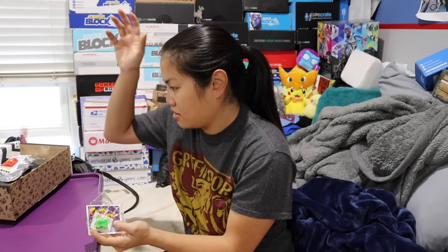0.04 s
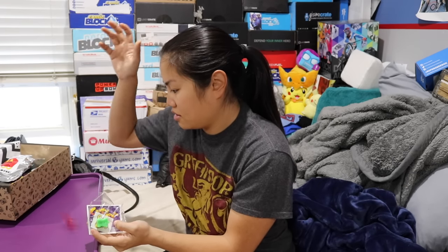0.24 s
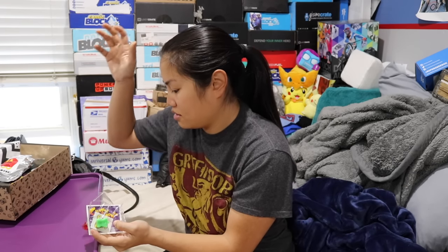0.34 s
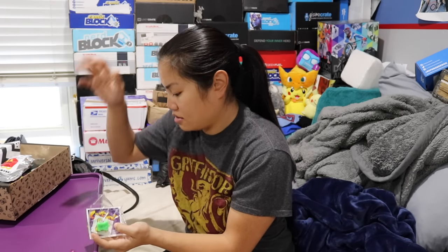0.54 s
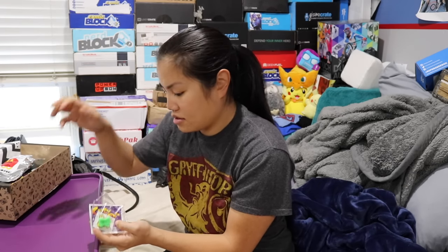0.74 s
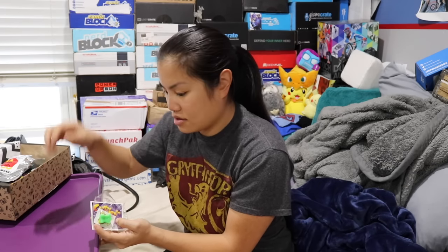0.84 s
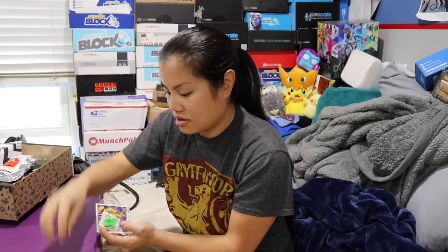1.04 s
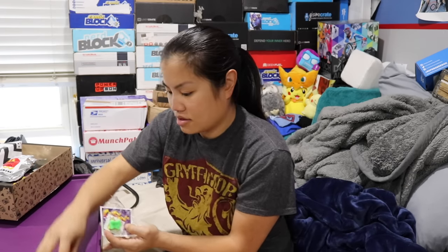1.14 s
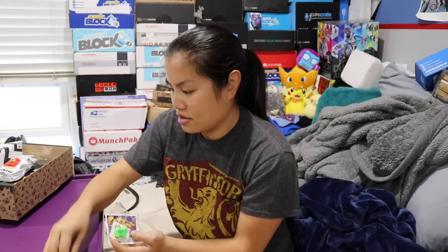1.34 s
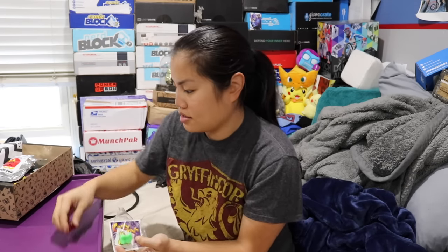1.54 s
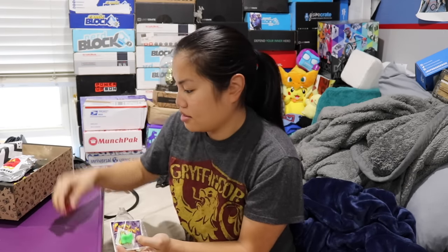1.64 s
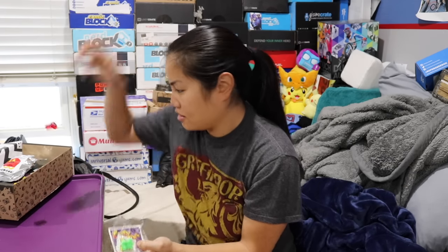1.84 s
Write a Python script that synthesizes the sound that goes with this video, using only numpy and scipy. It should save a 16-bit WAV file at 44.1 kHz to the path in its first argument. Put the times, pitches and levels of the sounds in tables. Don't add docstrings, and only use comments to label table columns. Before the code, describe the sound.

A handful of light plastic pieces is tossed down: brief scrape, one loud crack, rapid rattling bounces that fade into sparse taps, then a soft grab, heard close up indoors over low buzz and hiss.

```python
import sys
import numpy as np
from scipy import signal
from scipy.fft import rfft, irfft
from scipy.io import wavfile
from scipy.ndimage import uniform_filter1d

SR = 44100
rng = np.random.default_rng(int(sys.argv[2]) if len(sys.argv) > 2 else 0)


def natural_amplitude(level_db):
    exponent = np.asarray(level_db, float) / 20
    return 10 ** exponent


def digitize_waveform(pressure):
    field = np.atleast_2d(pressure).T
    bounded = np.clip(field, -1, 1)
    quanta = np.round(bounded * 32767).astype(np.int16)
    wavfile.write(sys.argv[1], SR, quanta)


N = 83790
t = np.arange(N) / SR

# frequency in Hz, level in dB.
HISS_COLOUR = [(25, -11.5), (70, -0.5), (170, 11.5), (400, 7.5), (1000, 1), (4000, -4.5), (12000, -11.5),
               (15900, -17.5)]
# start in seconds, level in dB, pitch in Hz, t60 in seconds.
THUDS = [(0.21, -51.5, 60, 0.2), (0.2, -38.5, 178, 0.037), (0.31, -45, 298, 0.13), (.332, -46.5, 170, 0.11),
         (.4915, -20, 382, 0.079), (0.45, -47.5, 128.4, 0.15), (1.1, -44, 186, 0.1), (.4915, -29, 230, .07),
         (.4915, -37.5, 180, .12)]
# start in seconds, level in dB, pitch in Hz, t60 in seconds.
TICKS = [(0.176, -33, 3850, 0.0091), (0.3324, -33.5, 8600, 0.0014), (.36, -33.5, 11770, 0.0024),
         (0.4172, -30.5, 11000, 0.0013), (.5235, -32, 11000, 0.0013), (.5499, -23, 11980, .001),
         (.594, -34, 11640, .002), (.652, -45, 12300, .02), (0.671, -46.5, 12300, 0.012),
         (.687, -48.5, 12300, .03)]
# start in seconds, level in dB, pitch in Hz, t60 in seconds.
STRIKE_NOTES = [(.4914, -20, 854, 0.024), (.4914, -11, 1136, 0.045), (.4914, -35, 1390, 0.062),
                (.4914, -12.5, 1766, 0.029), (.4914, -15, 2166, .04), (.4911, -13, 3840, 0.015),
                (.4914, -24, 760, .08), (.4911, -50, 7700, .008), (.908, -42, 1060, 0.073),
                (.908, -35.5, 790, 0.063), (.962, -36, 1580, 0.07), (.962, -33, 830, 0.033),
                (1.0285, -33.5, 1200, 0.069), (1.0285, -37.5, 818, 0.09), (1.0285, -49, 1020, 0.063),
                (1.0285, -43, 2790, 0.062), (1.134, -37.5, 960, 0.047), (1.134, -44, 746, 0.081),
                (1.134, -33, 1690, .05), (1.134, -52, 4080, 0.075), (1.134, -51, 2790, 0.036),
                (1.188, -33, 1090, 0.031), (1.188, -38, 832, 0.069)]
# time in seconds, level in dB, brightness in dB,
# tray weight in dB, smear (smooth noise over grains) in dB.
SKIDS = [
    [(.188, -52.5, -1, -17, 3), (.192, -44.5, -14, 23.5, 5), (.205, -36.5, -17.5, 21.5, -4),
     (.228, -30, -24.5, 19, 2.5), (.25, -35.5, -25, 17.5, 5), (.27, -36.5, -27.5, 6.5, 6.5),
     (.285, -39.5, -38, 3, 5.5), (.331, -48.5, -39, -5, 2.5)],
    [(.332, -36.5, -16, 9, 15), (.362, -28, -17.5, 13.5, 3.5), (.39, -31.5, -15.5, -4, 5.5),
     (.416, -30.5, -25, -7.5, 4)],
    [(.4165, -30, -16, -13.5, -2.5), (.436, -29, -13.5, -16, 11), (.452, -29, -17, -17.5, 8.5),
     (.47, -34, -16.5, -17, 6), (.491, -36.5, -21.5, -15, 6)],
    [(.4915, -23.5, -31.5, 3, 0.5), (.523, -35, -32.5, -9.5, 5)],
    [(.5235, -31.5, -17, -4.5, 4.5), (.56, -27.5, -18, -5, 8), (.608, -31.5, -16, -6.5, 8),
     (.622, -34.5, -28, -6.5, 3), (.648, -34.5, -31, -9.5, -6)],
]
# time in seconds, level in dB, brightness in dB,
# tray weight in dB, smear in dB.
TUMBLES = [
    [(.649, -28, -19, -11, -16.5), (.665, -32.5, -27, -18, -16), (.669, -27.5, -17.5, -15, -2),
     (.682, -32, -24, -10, -7), (.686, -29, -12, -4.5, -10), (.705, -32.5, -25, 2.5, -10.5),
     (.726, -33.5, -38, -18, -12), (.785, -34, -27, -1.5, 5), (.83, -37, -66, 3, -11),
     (.89, -60, -54, -13, 16)],
    [(1.256, -69.5, 5, 4, -8), (1.266, -43, -11, -28, -3.5), (1.29, -39, -27.5, -25, -6),
     (1.307, -41.5, -16.5, -3, 5), (1.313, -50, -34, -17, 13.5), (1.36, -66.5, -6, -12, 8.5)],
]
# frequency in Hz, level in dB.
SKID_BODY = [(180, -52), (300, -6), (600, -1.5), (1200, -0.5), (2800, 1.5), (4500, -3), (6200, -12),
             (6600, -27)]
# frequency in Hz, level in dB.
SKID_SHINE = [(4600, -5.5), (5600, 15), (6400, 10), (7200, 11), (8500, 6), (9000, -3), (10500, -20)]
# frequency in Hz, level in dB.
TUMBLE_BODY = [(300, -15), (650, 2.5), (1200, 3), (2500, 1), (4000, -8.5), (6000, -19), (6800, -36)]
# frequency in Hz, level in dB.
TUMBLE_SHINE = [(4600, -28), (5600, 8.5), (6500, -7.5), (8000, -0.5), (10000, -20.5), (12000, -36)]
# frequency in Hz, level in dB.
RATTLE_AIR = [(8000, -22.5), (9000, 0), (10500, -4), (13200, -2.5), (15000, -12), (15800, -17.5)]
# pitch in Hz, width in Hz, level in dB.
TRAY_MODES = [(249, 45, -18), (463.2, 16, -9), (632, 9.7, -9), (336, 20, -20), (850, 320, -26)]
# time in seconds, peak in dB, contact pitch in Hz,
# early ring in dB re the peak, top of the click in Hz.
HITS = [(0.332, -26.5, 1700.0, -7, 9000), (0.4167, -16, 2600.0, -11, 9000),
        (0.4912, -1.4, 1600.0, -18, 6500), (0.5235, -13.4, 3000.0, -12, 9000),
        (0.5468, -9.3, 4410.0, -19, 9000), (0.5499, -11.7, 4410.0, -20, 9000),
        (0.594, -6.2, 2760.0, -19, 6000), (0.6012, -4.7, 3150.0, -21, 6000),
        (0.6219, -20.3, 2000.0, -14, 5000), (0.6404, -16.5, 2450.0, -18, 5500),
        (0.649, -8.1, 2450.0, -20, 6500), (0.6673, -6.7, 3680.0, -19, 6800),
        (0.6839, -6.8, 3150.0, -20, 6800), (0.6987, -18.0, 2200.0, -14, 4500),
        (0.7317, -18.8, 2450.0, -16, 4300), (0.7365, -18.0, 2200.0, -20, 4300),
        (0.7544, -14.0, 2760.0, -18, 5500), (0.762, -20.2, 2450.0, -20, 4300),
        (0.771, -19.4, 3150.0, -15, 5500), (0.7795, -14.6, 3680.0, -16, 6300),
        (0.8149, -16.0, 2760.0, -15, 6300), (0.8557, -23.8, 2450.0, -16, 4200),
        (0.9078, -23.6, 2760.0, -15, 4200), (0.9582, -38, 1500.0, -6, 3000),
        (0.9617, -18.7, 3680.0, -14, 6800), (1.0283, -23.2, 2000.0, -15, 3100),
        (1.1165, -47.6, 1700.0, -10, 2200), (1.1339, -22.3, 2760.0, -16, 4300),
        (1.1879, -25.7, 2450.0, -13, 4200)]
# time in seconds, peak in dB, contact pitch in Hz,
# early ring in dB re the peak, top of the click in Hz.
GRABS = [(1.2662, -29.3, 920.0, -13, 4500), (1.2786, -28, 2200.0, -11, 4500),
         (1.2905, -31, 1200.0, -15, 4500)]
# delay in seconds, level in dB, sign.
ECHOES = [(.0031, -7, -1), (.0052, -15.5, 1)]
# band centre in Hz, level in dB, t60 in seconds.
RING_BANDS = [(250, -19, 0.17), (514, -15, 0.19), (980, -8, 0.17), (1520, -13, 0.19), (2510, -12, .1),
              (4220, -16, 0.13), (6610, -11.5, 0.032), (11000, -12.5, 0.036)]
# pitch in Hz, level in dB, t60 in seconds.
BODY_MODES = [(852, -38.5, .04), (1135, -25, 0.065), (1280, -29.5, 0.07), (1648, -39.5, .06),
              (2140, -26.5, 0.03), (2840, -34, 0.096), (4010, -29, 0.054)]

RING_RISE_S = .0012


def level(x, db):
    return x * natural_amplitude(db) / np.sqrt(np.mean(x ** 2))


def colour(x, points):
    size = x.shape[-1]
    hz = np.arange(size // 2 + 1) * SR / size + 1
    point_hz, point_db = np.array(points, float).T
    db = np.interp(np.log(hz), np.log(point_hz), point_db, left=-60, right=-60)
    return irfft(rfft(x) * natural_amplitude(db), size)


def reson(x, hz, width_hz):
    return signal.lfilter(*signal.iirpeak(hz, hz / width_hz, fs=SR), x)


def mains_and_hiss():
    mains_hz, spike_at_s = 60.02, 1.4508
    hum_db, even_db, buzz_db = -69, -80.5, -64
    lead_hz, fall_hz, top_hz = 60.1, 200, 3300
    turn = 2 * np.pi * mains_hz * (t - spike_at_s)
    buzz = natural_amplitude(hum_db) * np.cos(turn) + natural_amplitude(even_db) * np.cos(2 * turn)
    for k in range(3, 80, 2):
        jf = 1j * k * mains_hz
        shape = jf / (jf + lead_hz) / (1 + jf / fall_hz) / (1 + jf / top_hz)
        buzz = buzz + natural_amplitude(buzz_db) * np.abs(shape) * np.cos(k * turn + np.angle(shape))
    return buzz + level(colour(rng.standard_normal(N), HISS_COLOUR), -68)


def dying_notes(rows, rise=10):
    out = np.zeros(N)
    for at, db, hz, t60 in rows:
        age = np.maximum(t - at, 0)
        soft_start = 1 - np.exp(-age * rise / t60)
        out += natural_amplitude(db - 60 * age / t60) * np.sin(2 * np.pi * hz * age) * soft_start
    return out


def follow(curves, column):
    out = np.zeros(N)
    for curve in curves:
        points = np.array(curve, float)
        inside = (t >= points[0, 0]) * (t < points[-1, 0])
        out += np.interp(t, points[:, 0], points[:, column]) * inside
    return out


def contact_grains(smear_db):
    grains_per_s, spread_db, rarest = 5000, 2, .03
    moment, sign, luck = rng.random((3, N))
    force = natural_amplitude(-spread_db * np.log(np.maximum(luck, rarest)))
    grains = (moment < grains_per_s / SR) * np.sign(sign - .5) * force
    smeared = level(grains, 0) + natural_amplitude(smear_db) * rng.standard_normal(N)
    return smeared / np.sqrt(1 + natural_amplitude(2 * smear_db))


def rattle(curves, body_colour, shine_colour, air_db):
    loudness, bright, weight, smear = [follow(curves, k) for k in range(1, 5)]
    touching = follow(curves, 0) > 0
    grains = contact_grains(smear)

    def gain(db):
        return uniform_filter1d(touching * natural_amplitude(db), size=40)

    tray = np.zeros(N)
    for hz, width_hz, db in TRAY_MODES:
        tray += 5 * natural_amplitude(db) * reson(grains * gain(loudness + weight), hz, width_hz)
    body = gain(loudness) * level(colour(grains, body_colour), 0)
    shine = gain(loudness + bright) * level(colour(grains, shine_colour), 0)
    air_gain = gain(loudness + bright + air_db + 0.72 * (bright + 18))
    air = air_gain * level(colour(grains, RATTLE_AIR), 0)
    return air + body + shine + tray


def skids_and_tumbles():
    thin = signal.butter(2, 230, "high", fs=SR, output="sos")
    skids = rattle(SKIDS, SKID_BODY, SKID_SHINE, air_db=-12)
    tumbles = rattle(TUMBLES, TUMBLE_BODY, TUMBLE_SHINE, air_db=-30)
    return signal.sosfilt(thin, skids + tumbles)


def ring_tails(count):
    size = 8192
    age = np.arange(size) / SR
    octave = np.log2(np.arange(size // 2 + 1) * SR / size + 1)
    centres = np.log2([row[0] for row in RING_BANDS])
    noise = rfft(rng.standard_normal((count, size)))
    out = 0
    for k, (_, db, t60) in enumerate(RING_BANDS):
        share = np.sqrt(np.interp(octave, centres, np.arange(len(RING_BANDS)) == k))
        out = out + irfft(noise * share, size) * natural_amplitude(db - 60 * age / t60)
    return out * (1 - np.exp(-age / RING_RISE_S)) * .5


def body_ring(size):
    scatter_db, detune = 4, .04
    age = np.arange(size) / SR
    out = np.zeros(size)
    for hz, db, t60 in BODY_MODES:
        louder, sharper, phase = rng.standard_normal(3)
        swing = np.sin(2 * np.pi * (hz * (1 + detune * sharper) * age + phase))
        out += natural_amplitude(db + scatter_db * louder - 60 * age / t60) * swing
    return out * (1 - np.exp(-age / RING_RISE_S))


def knock(db, hz, top_hz):
    def lobe(u):
        return -u * np.exp((1 - u ** 2) / 2)

    def top_cut(f):
        return 1 / np.sqrt(1 + f ** 24)

    u = np.arange(-128, 384) / SR * hz * 4
    push = lobe(u - 1) + natural_amplitude(-6 + .25 * db) * lobe(2.0 * u - 1)
    band = np.arange(257) * SR / 512 + 1
    treble = top_cut(band / top_hz) + natural_amplitude(-21) * top_cut(band / top_hz / 1.42)
    low_hz = 337 * 2 ** (-db / 31.5)
    jf = 1j * band / low_hz
    bass_cut = jf ** 2 / (jf ** 2 + np.sqrt(2) * jf + 1)
    return irfft(rfft(push) * treble * bass_cut)


def strikes():
    hits = list(HITS) + list(GRABS)
    out = np.zeros(N + 16384)
    for (at, db, hz, ring_db, top_hz), tail in zip(hits, ring_tails(len(hits))):
        push = knock(db, hz, top_hz)
        sound = signal.fftconvolve(push, tail + body_ring(len(tail)))
        sound *= natural_amplitude(ring_db - 2.5) / sound[178:458].std()
        for late, echo_db, sign in [(0, 0, 1)] + list(ECHOES):
            start = int(late * SR)
            sound[start:start + len(push)] += sign * natural_amplitude(echo_db) * push * 1.95 / np.ptp(push)
        start = int(at * SR) - 128
        out[start:start + len(sound)] += sound * natural_amplitude(db)
    return out[:N]


def scene():
    single = dying_notes(THUDS) + dying_notes(TICKS) + dying_notes(STRIKE_NOTES, rise=60)
    return (mains_and_hiss() + single + skids_and_tumbles() + strikes())[None]


def band_limit(x):
    return signal.sosfilt(signal.butter(12, 15800, fs=SR, output="sos"), x)


def record(dry):
    top_cut = signal.ellip(8, .2, 70, 15700, fs=SR, output="sos")
    return band_limit(signal.sosfilt(top_cut, dry))


dry = scene()
out = record(dry)
digitize_waveform(out)
```